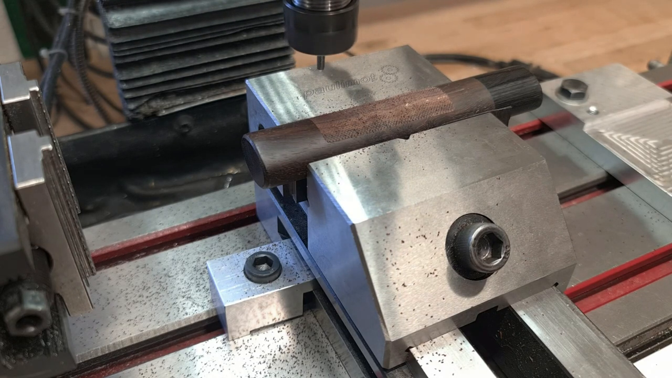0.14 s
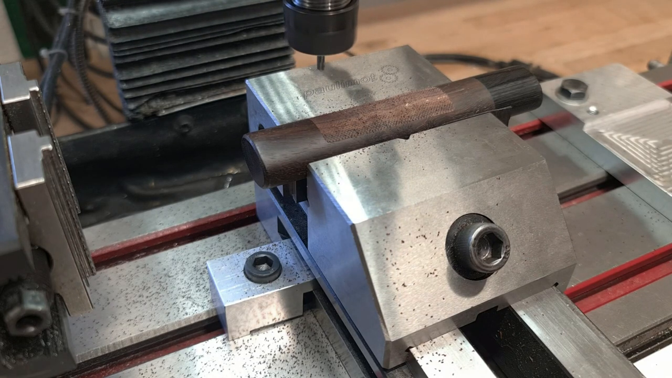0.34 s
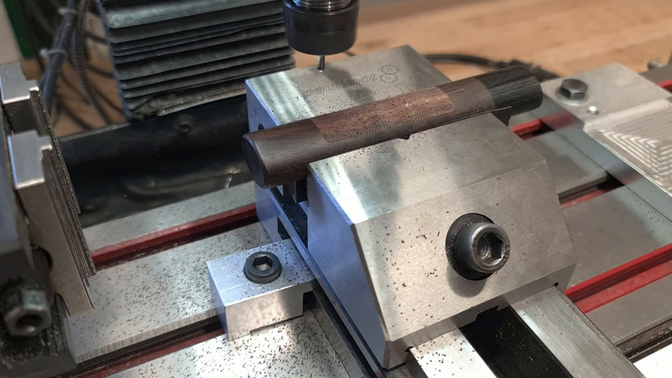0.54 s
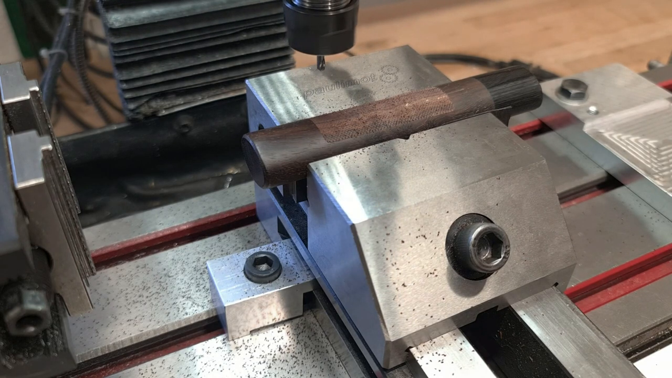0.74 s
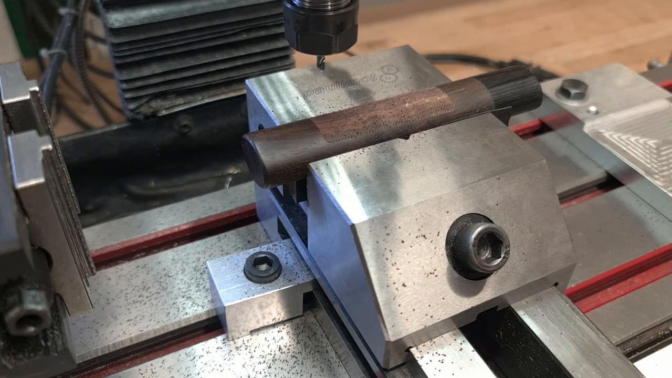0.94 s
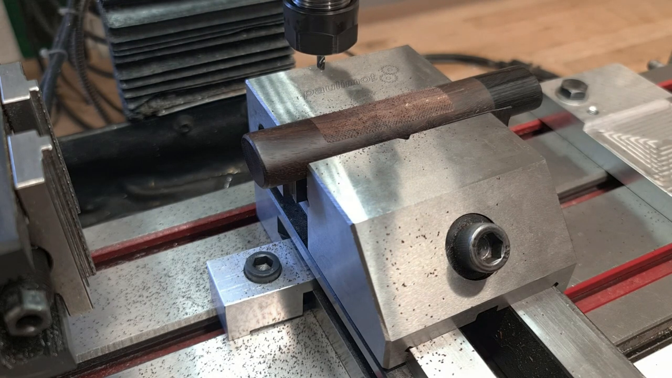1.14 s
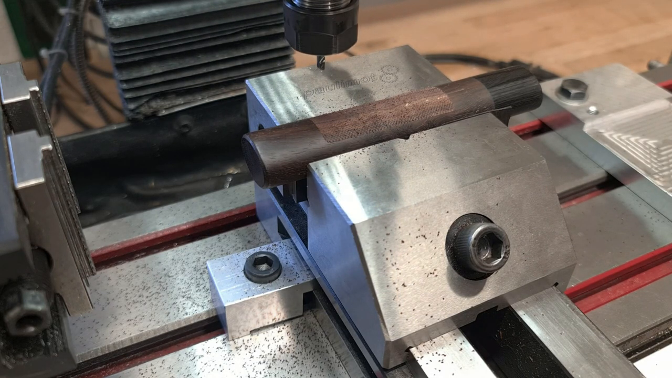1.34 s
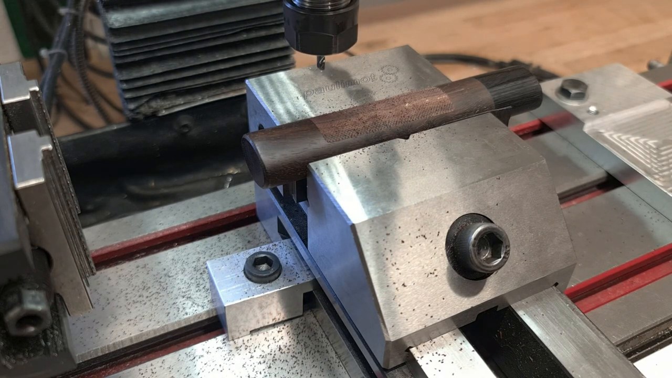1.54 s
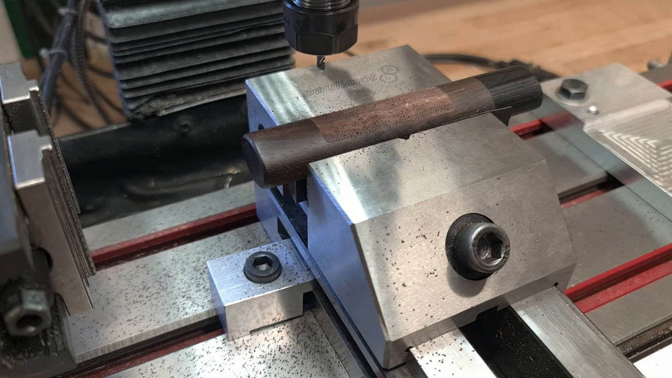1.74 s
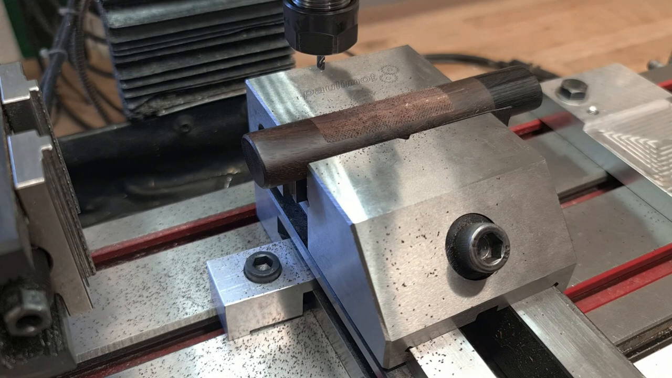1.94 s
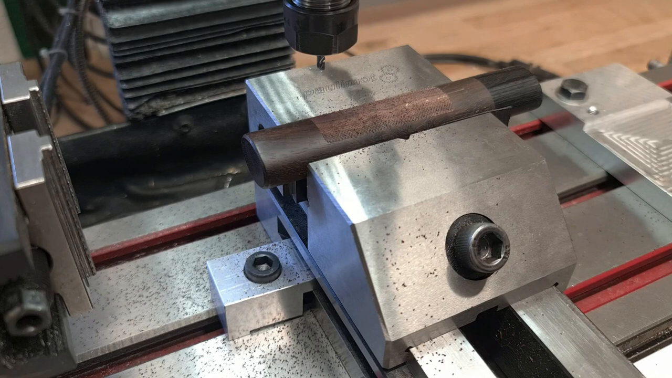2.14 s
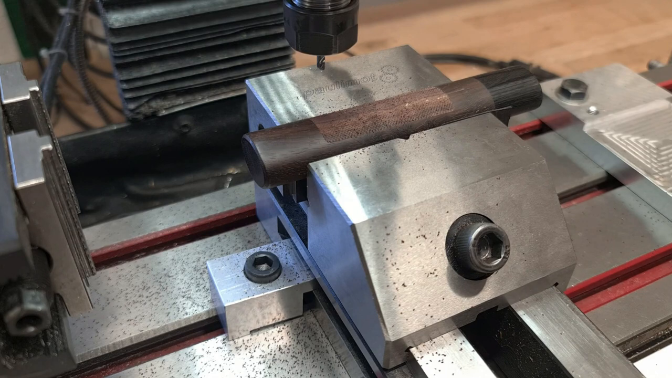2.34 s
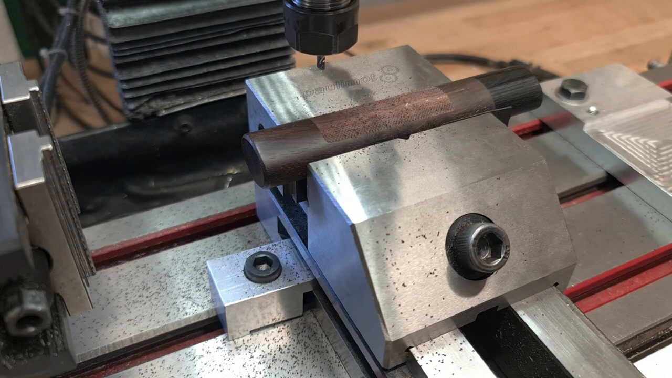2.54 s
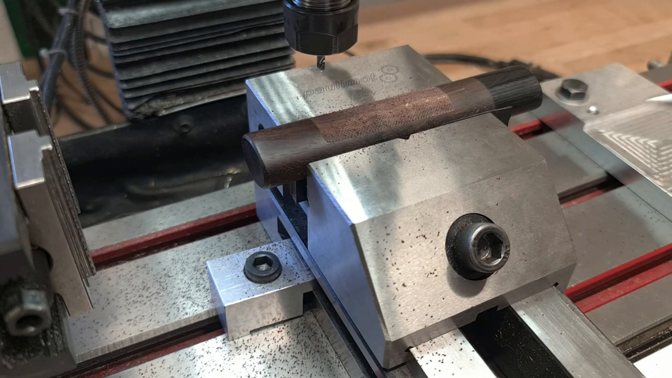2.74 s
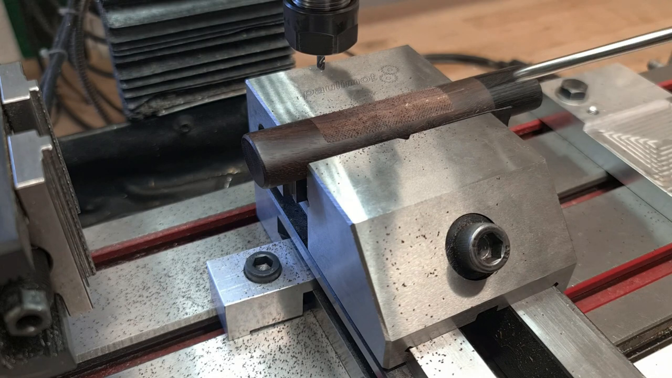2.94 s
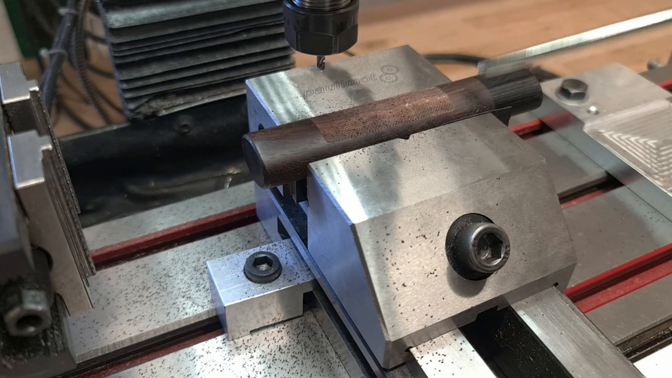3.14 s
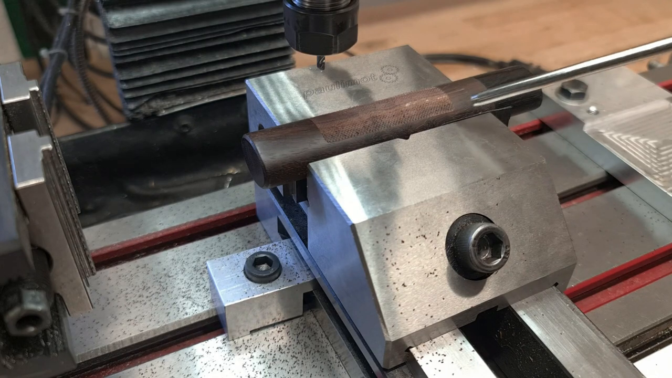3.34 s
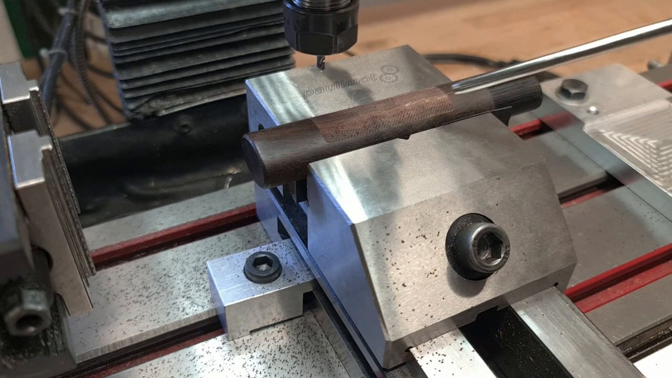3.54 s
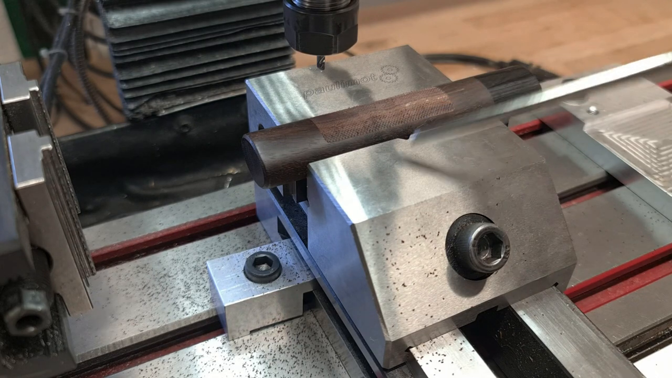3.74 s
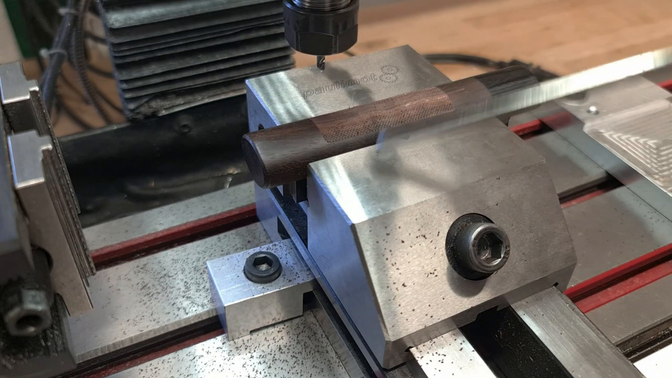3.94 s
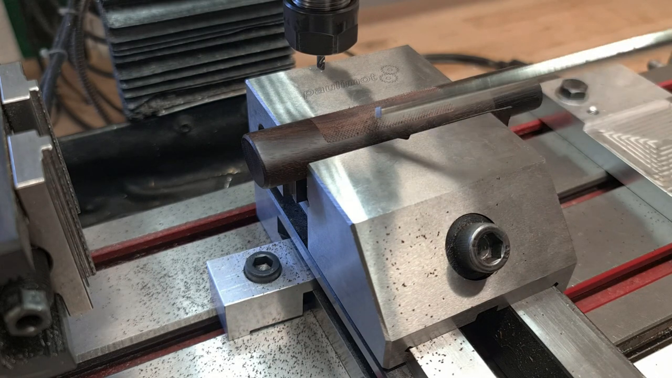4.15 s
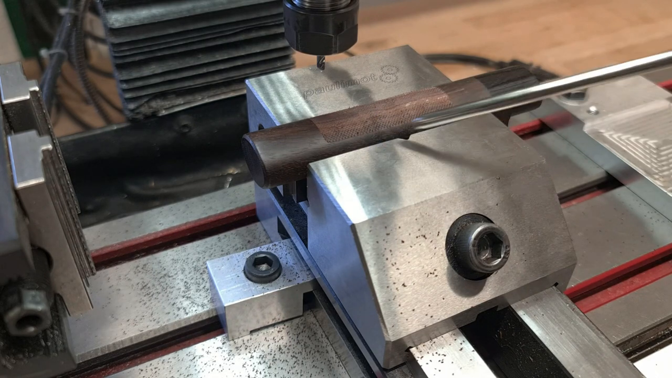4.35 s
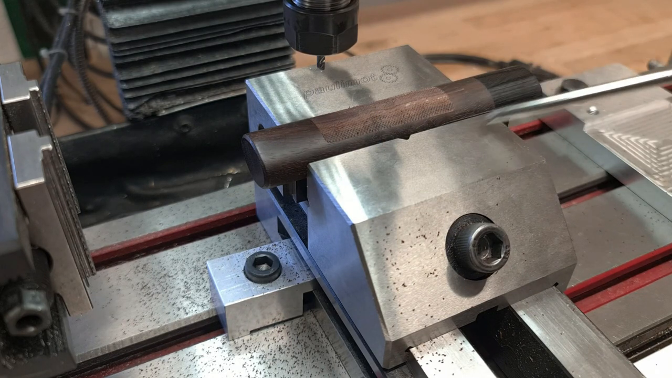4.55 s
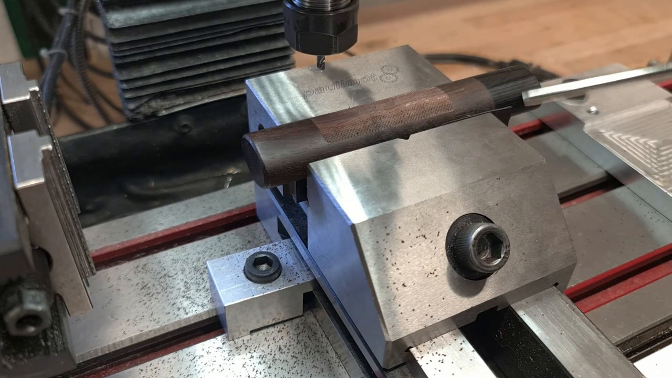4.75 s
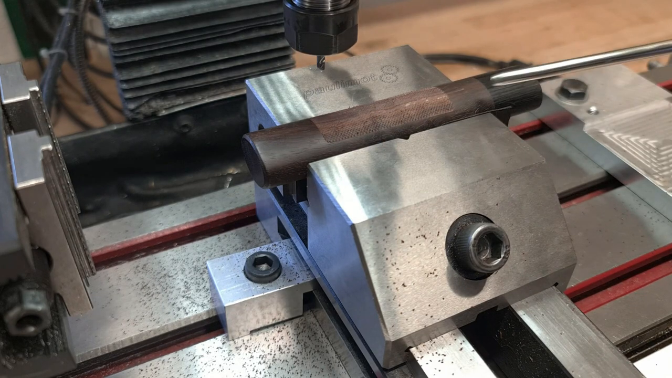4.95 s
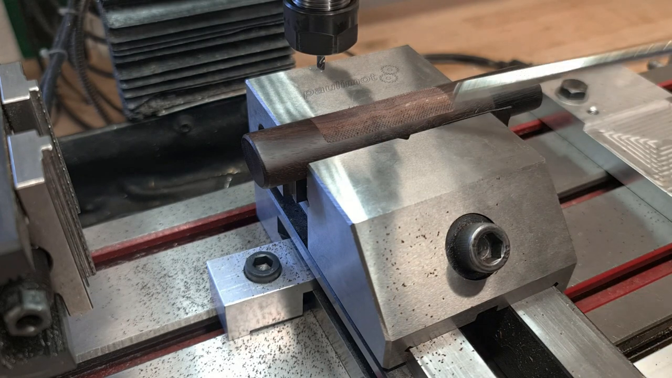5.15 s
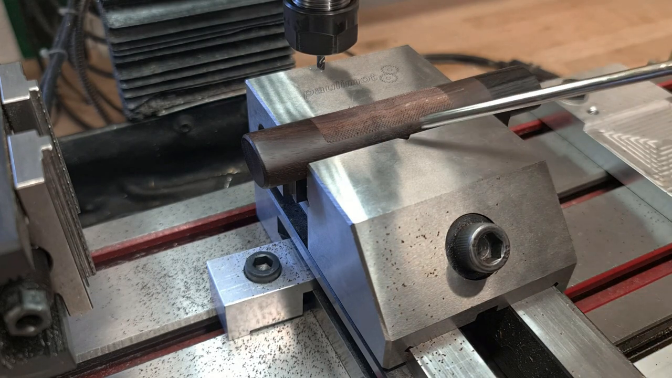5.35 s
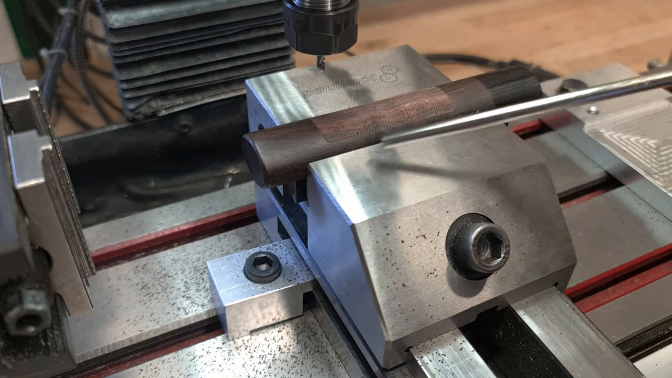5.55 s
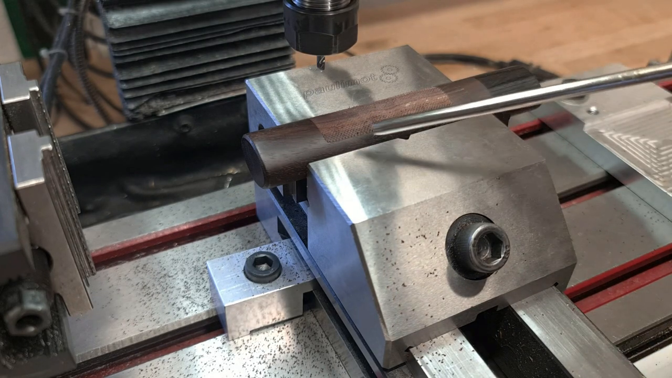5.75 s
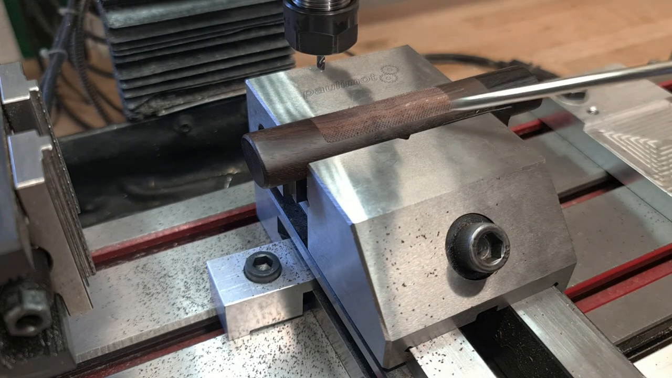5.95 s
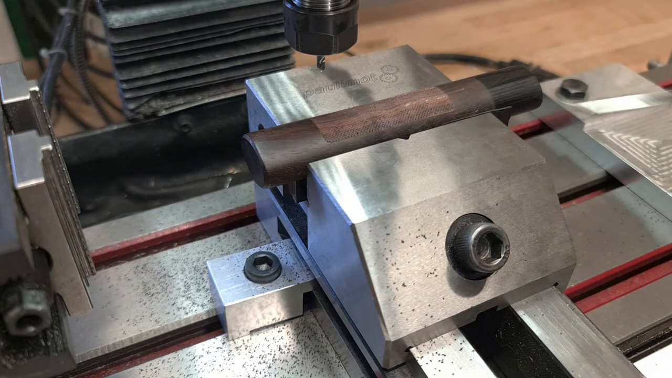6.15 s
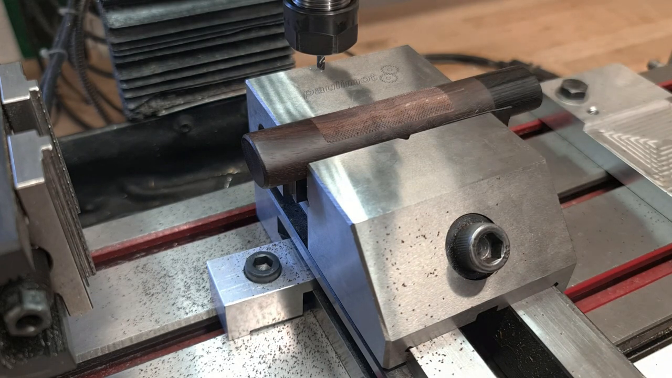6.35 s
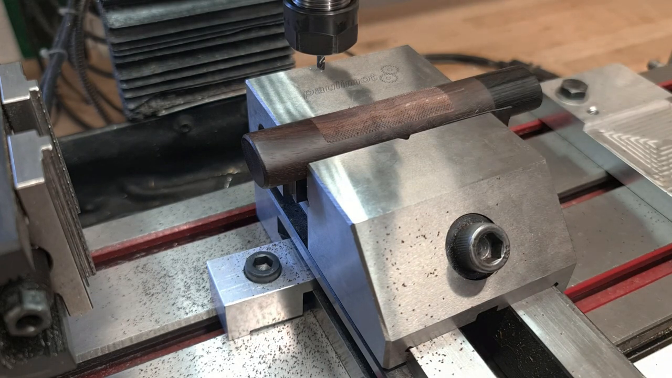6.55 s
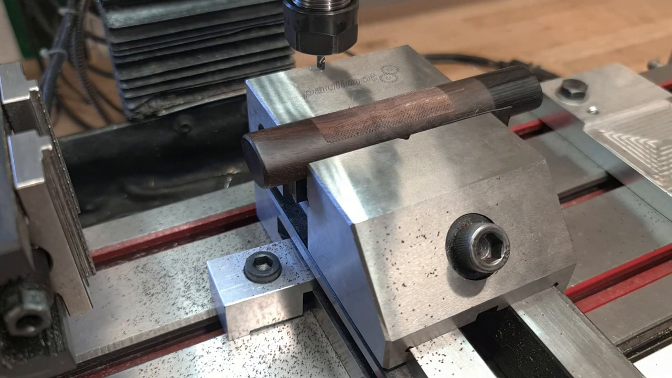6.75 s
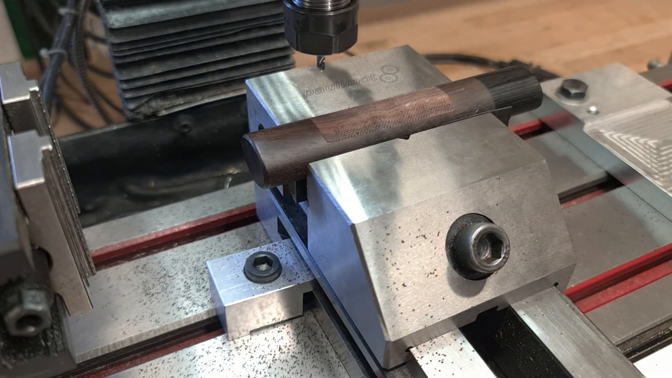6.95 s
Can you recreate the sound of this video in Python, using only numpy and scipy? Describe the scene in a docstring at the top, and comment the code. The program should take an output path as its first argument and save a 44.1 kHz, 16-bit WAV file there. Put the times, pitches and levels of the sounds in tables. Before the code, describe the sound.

A small milling machine whooshes to rest over workshop hum, then an air gun hisses for three seconds and is put down with a clatter.

```python
"""The whoosh of a small milling machine coasting to rest, over the hum of workshop fans and motors.
An air blow gun comes off its hook with a few knocks, ringing clicks and a squealing scrape.
It blows over the vise and the part for three seconds: the turbulent jet hisses, makes slots and
gaps sing, and roars where it strikes edges. Then the gun is put down with a clatter."""
import sys
import numpy as np
from scipy import signal
from scipy.io import wavfile
from scipy.ndimage import uniform_filter1d

SR = 44100
rng = np.random.default_rng(int(sys.argv[2]) if len(sys.argv) > 2 else 0)


def transcribe(signal):
    """Save signal, clipped to [-1, 1], as a 16-bit WAV file at the path in sys.argv[1]."""
    frames = np.atleast_2d(signal).T
    limited = np.clip(frames, -1, 1)
    pcm = np.round(limited * 32767).astype(np.int16)
    wavfile.write(sys.argv[1], SR, pcm)


N = 308259


def amp(db):
    """Decibels to gain."""
    return 10 ** (np.asarray(db) / 20)


def unit_rms(x):
    """Scales to rms 1."""
    return x / np.sqrt(np.mean(abs(x) ** 2) + 1e-20)


def curve(points, hz):
    """Reads a breakpoint curve on a log-frequency axis."""
    f, value = np.transpose(points)
    return np.interp(np.log(hz + 1), np.log(f + 1), value)


def bells(peaks, hz):
    """Sum of bell-shaped boosts and cuts, in dB."""
    return sum(db / (1 + ((hz - f) / (width / 2)) ** 2) for f, width, db in peaks)


def normalise(shape_db, hz, lo_hz, hi_hz):
    """Shifts a spectrum so that its band lo-hi has rms 1."""
    power = (amp(shape_db) ** 2 * ((hz > lo_hz) & (hz < hi_hz))).sum(0)
    return shape_db - 10 * np.log10(power / len(hz))


def grid(size, until=N / SR):
    """Times and frequencies of short-time frames."""
    hop = size // 4
    return np.arange(int(until * SR) // hop + 5) * hop / SR, np.fft.rfftfreq(size, 1 / SR)[:, None]


def flutter(shape, bins, frames):
    """Random modulation of rms 1, smooth over some bins and frames."""
    field = rng.standard_normal(shape[::-1]).T
    return unit_rms(uniform_filter1d(uniform_filter1d(field, bins, 0), frames, 1))


def stereo_noise(field_db, coherence, lead=0, pan_db=0):
    """Noise shaped over frequency and time by field_db; the left side leads by `lead` radians."""
    size = 2 * len(field_db) - 2
    a, b, c, d = rng.standard_normal(field_db.shape[::-1] + (4,)).T
    left, independent = a + 1j * b, c + 1j * d
    right = (coherence * left + np.sqrt(1 - coherence ** 2) * independent) * np.exp(-1j * lead)
    spectra = np.array([left * amp(pan_db / 2), right * amp(-pan_db / 2)]) * amp(field_db)
    sound = signal.istft(spectra, nperseg=size, noverlap=size - size // 4)[1][:, :N] / np.sqrt(.6 * size)
    return np.pad(sound, ((0, 0), (0, N - sound.shape[1])))


# Colour of the spinning machine's air rush: f/Hz, level/dB
WHOOSH_EQ = [(88, -42), (150, 1), (179, -36), (270, -7), (309, -7), (854, -4), (1040, -13), (1290, -6.5),
             (2450, -9), (5570, -8), (16000, -21.5)]


def spindle():
    """The rush of spindle and fan fades as they slow, then stops; the treble dies first."""
    stop_s, coast_db_per_s, stop_db_per_s = .47, -44.5, -200
    t, hz = grid(size=512, until=.7)
    stopped = np.maximum(t - stop_s, 0)
    level_db = -35 + coast_db_per_s * t + stop_db_per_s * stopped
    treble_db = -8 - 5 * t - 400 * stopped
    field = normalise(curve(WHOOSH_EQ, hz), hz, 1000, 8000) + level_db
    field += treble_db * np.clip((hz - 7000) / 1500, 0, 1)
    field += 2.6 * flutter(field.shape, bins=8, frames=8)
    return stereo_noise(field, coherence=.11, pan_db=1.3)


# Broad colour of the steady background noise: f/Hz, level/dB
BED_EQ = [(15, -61), (25, -33.5), (90, -18.5), (475, -14.5), (515, -6.5), (691, -15.5), (749, -11),
          (879, -21.5), (1350, -12.5), (1910, -19), (2300, -20.5), (12400, -45.5), (15000, -63.5)]
# Its humps and dips: f/Hz, width/Hz, gain/dB
BED_BELLS = [(55, 15, -3), (95.6, 20, 14.5), (195.4, 20, 5.5), (382, 14, 5), (536, 46, -3), (743, 84, -1),
             (1400, 125, 2.5), (2180, 100, -6.5), (3130, 80, 2), (3730, 140, 3.5), (6800, 900, 3),
             (8500, 1100, -11), (10800, 600, -9), (12400, 600, 4)]
# Its stereo image, wider toward the top: f/Hz, coherence/0-1
BED_COHERENCE = [(60, .88), (250, .9), (600, .75), (1000, .55), (2500, .5), (4000, .25), (15000, .2)]
# Its phase offset: f/Hz, left lead/rad
BED_LEAD = [(60, 0), (780, .7), (1400, 2.5), (2330, 5.4), (15000, 6)]
# Its balance: f/Hz, left over right/dB
BED_PAN = [(60, -3), (120, 0), (240, -0.5), (480, 0), (950, -1.5), (1890, 3), (3770, -2), (7520, 1.5),
           (15000, -6.5)]


def noise_bed():
    """Broad, slowly shifting background noise in the workshop."""
    t, hz = grid(size=2048)
    field = normalise(curve(BED_EQ, hz) + bells(BED_BELLS, hz), hz, 0, SR) - 49.5
    field = field + 1.3 * flutter((len(hz), len(t)), bins=2, frames=24)
    field += 2.2 * flutter(field.shape, bins=2, frames=250)  # standing waves of the room
    return stereo_noise(field, curve(BED_COHERENCE, hz), curve(BED_LEAD, hz), curve(BED_PAN, hz))


# Tones of motors and fans, ahead of the bed's fade: f/Hz, starting rms level/dB, slope/(dB/s)
MOTOR_TONES = [(96.9, -72, 0), (197, -72, 0), (366.1, -73, 0), (511.4, -56, 0), (565, -72, 0),
               (614, -73, .5), (635.2, -72, 0), (742.9, -68.5, -.6), (775.2, -70, -1), (1017, -77, 0),
               (1330, -66, -.4), (1394, -73, 0), (1534, -71, 0), (1755, -67.5, -1.4), (1825, -80, 0),
               (2043, -81, .7), (2132, -75.5, 0), (2336, -71.5, 0), (2600, -80, 0), (3203, -81, -.2),
               (3585, -77, -.2), (12242, -91, 0)]


def motor_hum():
    """Motors and fans hold tones that waver in level and pitch."""
    t, _ = grid(size=2048)
    out, time = np.zeros((2, N)), np.arange(N) / SR
    for f, db, slope in MOTOR_TONES:
        drift, swell = (np.interp(time, t, row) for row in flutter((2, len(t)), bins=1, frames=6))
        cycles = np.cumsum(f * (1 + .0002 * drift)) / SR + rng.random((2, 1)) * .15
        out += np.sqrt(2) * amp(db + slope * time + .9 * swell) * np.sin(2 * np.pi * cycles)
    return out


# Dull knocks of the machine, then of the hook: t/s, level/dB, f/Hz, t60/s
KNOCK_CUES = [(0.02, -44.5, 271, 0.2), (0.205, -44, 275, 0.17), (1.645, -47, 1030, .09),
              (1.704, -43.5, 397, 0.12), (1.742, -37.5, 414, 0.15), (1.797, -39.5, 367, 0.083),
              (2.152, -44, 700, 0.059), (6.141, -44.5, 400, 0.093)]


def knocks():
    """Each bump sets one damped low mode ringing, dead centre."""
    attack_s = .0016
    out, t = np.zeros((2, N)), np.arange(8192) / SR
    for start, db, hz, t60 in KNOCK_CUES:
        envelope = amp(db - 60 * t / t60) * np.minimum(t / attack_s, 1)
        out[:, round(start * SR):][:, :len(t)] += envelope * np.sin(2 * np.pi * hz * t)
    return out


# Modes of the gun's steel tube: f/Hz, level/dB, t60/s
TUBE_MODES = [(4350, -6, .022), (6200, -5, .025), (8950, -15, .018), (10850, -14, .022), (14200, -13, .018)]
# Clicks of machine and gun:
# t/s, level/dB, left over right/dB, treble gain/dB, ring f/Hz, ring gain/dB, ring t60/s
CLICK_CUES = [(0.352, -36.5, 1, -14, 5930, -7, 0.012), (0.41, -38, 2.5, -12, 5600, -14, .015),
              (1.6482, -46, -4, -14, 5360, -12, .02), (1.7414, -36, -6, 1, 4780, 1, 0.036),
              (1.8744, -35.5, -9, 6.5, 2780, -13, 0.06), (1.951, -34, -6, 6, 2260, -2.5, 0.035),
              (2.0914, -46.5, -6, -10, 3100, -10, .015), (2.1445, -48, -2, -16, 3700, -12, 0.06),
              (2.4655, -48, -6, -20, 2900, -6, .02), (2.4724, -32, -6, -9, 4980, -11, .014),
              (2.546, -44.5, -2.5, -14, 2930, 2, 0.012), (2.567, -52, -2.5, -14, 2950, 0, .015),
              (6.1053, -24, -5, -1.5, 2215, -19.5, .09), (6.1398, -25, -1, -2.5, 2210, -17, 0.068),
              (6.144, -28, -7, 5, 4470, -20, .11), (6.9086, -30.5, -3, -20, 2290, -5, 0.011)]


def clicks():
    """Metal hits: a two-band crack with its echo off the machine, a ring, and the tube's modes."""
    crack_t60_s, echo_t60_s, echo_db = .019, .16, -11
    out, t = np.zeros((2, N + 8192)), np.arange(8192) / SR
    bite = signal.butter(2, [2200, 7500], "band", fs=SR)
    treble = signal.butter(2, [8500, 15000], "band", fs=SR)
    tube = sum(amp(db - 60 * t / t60) * np.sin(2 * np.pi * hz * t) for hz, db, t60 in TUBE_MODES)
    for start, db, pan_db, treble_db, hz, ring_db, t60 in CLICK_CUES:
        white = rng.standard_normal((2, len(t))) + .34 * rng.standard_normal(len(t))
        burst = unit_rms(signal.lfilter(*bite, white))
        burst += amp(treble_db) * unit_rms(signal.lfilter(*treble, white))
        crack = amp(-7.5) * burst * (amp(-60 * t / crack_t60_s) + amp(echo_db - 60 * t / echo_t60_s))
        ring_envelope = amp(ring_db - 60 * (t / t60) ** 1.6) * np.minimum(t / .001, 1)
        ring = ring_envelope * np.sin(2 * np.pi * hz * t)
        # loose parts make the ringing uneven
        rattle = 1 + .5 * np.minimum(t / .015, 1) * unit_rms(uniform_filter1d(white, size=200))
        click = crack + rattle * (ring + amp(treble_db - 7) * tube)
        out[:, round(start * SR):][:, :len(t)] += amp(db + np.array([[.5], [-.5]]) * pan_db) * click
    return out[:, :N]


# Hose and gun sliding on metal:
# t/s, hold/s, level/dB, release/(dB/s), squeal f/Hz, squeal glide/(Hz/s), squeal gain/dB
SCRAPE_CUES = [(1.633, .04, -64, -78, 5400, 0, 12), (1.737, .02, -47, -150, 4750, 0, 14),
               (1.795, 0.073, -48.5, -150, 2700, 7000, 7), (1.869, 0.093, -44, -170, 2700, 5000, 10.5),
               (2.46, .0097, -53, -120, 5000, 0, 10), (6.114, .011, -46, -600, 4500, 0, 8),
               (6.147, 0.045, -43.5, -350, 4530, 0, 8), (6.9, .02, -51, -280, 6400, 0, 2)]
# Colour of the friction: f/Hz, level/dB
SCRAPE_EQ = [(590, -37), (1000, -6), (1380, -6.5), (3890, -8), (4470, -6), (6470, -7), (8550, -15.5),
             (9280, -11), (14400, -21), (16000, -21)]
# Resonances of the rubbed metal: f/Hz, width/Hz, gain/dB
SCRAPE_BELLS = [(2800, 300, 3), (4500, 350, 2), (6500, 500, 5), (9000, 500, 3)]


def scrapes():
    """Grainy friction noise; each slide rises, holds and dies away, squealing at its own pitch."""
    attack_s, squeal_width_hz = .0071, 300
    t, hz = grid(size=256)
    starts, *_, squeal_hz, glide, squeal_db = np.transpose(SCRAPE_CUES)
    cue = np.maximum(np.searchsorted(starts, t) - 1, 0)  # the latest slide in each frame
    pitch = squeal_hz[cue] + glide[cue] * (t - starts[cue])
    squeal = bells([(pitch, squeal_width_hz, squeal_db[cue])], hz)
    field = normalise(curve(SCRAPE_EQ, hz) + bells(SCRAPE_BELLS, hz) + squeal, hz, 2500, 15000)
    field += 2.2 * flutter(field.shape, bins=4, frames=20)
    time, envelope = np.arange(N) / SR, 0
    for start, hold, db, release, *_ in SCRAPE_CUES:
        attack = np.clip((time - start) / attack_s, 0, 1) ** 2
        envelope += attack * amp(db + release * np.maximum(time - start - attack_s - hold, 0))
    return envelope * stereo_noise(field, coherence=.13)


# Singing slots and gaps, and dips between them: f/Hz, width/Hz, gain at part/dB, gain over table/dB
CAVITY_BELLS = [(1068, 230, -4, 11.5), (1480, 1030, -8.5, 2), (1780, 100, -0.5, -6.5),
                (2490, 118.7, 9, -1.5), (2680, 110, 2, 6), (3060, 86, -2, 11.5), (3370, 260, 4.5, 3),
                (3716, 170, 0, 10), (3950, 150, -1.5, -5.5), (4420, 100, -4.5, 9), (4700, 200, 4, 0.5),
                (5880, 450, 1.5, 8.5), (6410, 510, 6.5, 11), (6810, 247, 2, 12.5), (7440, 200, 6, -7),
                (8890, 330, -0.5, 10.5), (11190, 540, 8.5, -5.5)]
# One gap sings out or falls quiet as the jet crosses it: middle t/s, length/s, f/Hz, width/Hz, gain/dB
GAP_CUES = [(2.9, 0.21, 4430, 220, 5), (2.874, 0.19, 3000, 2100, 2), (2.95, 0.33, 3720, 260, 4),
            (4.65, 0.52, 11500, 500, 2), (2.8, 0.27, 1020, 320, -8), (3.07, 0.12, 1600, 450, 5.5),
            (3.08, 0.19, 5300, 300, 5.5), (5.2, 0.52, 6340, 500, 3.5), (3.18, .35, 10200, 1400, 4),
            (3.25, .2, 4100, 200, 5), (4.62, .55, 5850, 200, 4.5), (4.5, .3, 5480, 200, -7),
            (5.1, .45, 2700, 100, 4), (4.14, 0.18, 4400, 120, 5), (4.05, 0.15, 7200, 360, 9),
            (4.172, 0.12, 3260, 200, 7.5), (4.17, 0.23, 15000, 500, 5), (4.52, 1, 13500, 880, 7.5),
            (4.65, 0.55, 4510, 130, 5), (5.25, 0.8, 1030, 93, 5.5), (5.3, 0.67, 1920, 50, 6),
            (5.57, .25, 4410, 110, 7), (5.204, 0.26, 7700, 430, -6), (5.3, 0.49, 14800, 650, 5),
            (5.2, .5, 13000, 600, 4), (5.586, 0.4, 3550, 190, 4.5), (5.55, 0.3, 3690, 140, 6)]


def singing_gaps(t, hz, over_table):
    """Moving EQ, in dB, of the cavities the jet excites; they drift as the hand trembles."""
    pitch_depth, gain_depth = .009, .15
    sway, waver = flutter((2 * len(CAVITY_BELLS), len(t)), bins=1, frames=30).reshape(2, -1, len(t))
    peaks = []
    for (f, width, part_db, table_db), bend, swell in zip(CAVITY_BELLS, sway, waver):
        db = part_db + over_table * (table_db - part_db)
        peaks.append((f * (1 + pitch_depth * bend), width, db * (1 + gain_depth * swell)))
    for mid, length, f, width, db in GAP_CUES:
        peaks.append((f, width, db * np.clip(2 - abs(t - mid) / (length / 4), 0, 1)))
    return bells(peaks, hz)


# Hiss with the nozzle at the part: f/Hz, level/dB
PART_HISS_EQ = [(590, -44), (1000, -40), (1550, 6.5), (1770, -3), (2490, -5), (4580, 1), (8500, -6.5),
                (11000, -32.5), (18700, -120)]
# Hiss over the open machine table: f/Hz, level/dB
TABLE_HISS_EQ = [(590, -29), (1000, -30), (1650, -3), (2320, -9), (2750, -3), (4040, -10), (4540, -4),
                 (8500, -27.5), (11000, -50), (18700, -120)]
# Midrange roar of air on edges: f/Hz, level/dB
ROAR_EQ = [(150, -45.5), (250, -24), (570, -1.5), (881, 0), (971, 4.5), (1500, 5.5), (1950, -36.5),
           (3300, -120)]
# Top-end fizz of the nozzle: f/Hz, level/dB
FIZZ_EQ = [(4120, -32.5), (7000, -6.5), (7690, -2.5), (9050, 1), (10300, -3.5), (11100, 0), (14700, 8.5),
           (15200, 9), (15650, -1), (15850, -28.5)]
# Low-end buffeting on edges: f/Hz, level/dB
BUFFET_EQ = [(24, -50.5), (40, -24), (86, -7), (286, -7.5), (400, -1), (520, -22.5), (880, -120)]
# Swells as the jet crosses an edge: middle t/s, length/s, roar/dB, fizz/dB, buffeting/dB
EDGE_CUES = [(2.91, 0.057, 1, 2, 12), (3.088, 0.24, 7, 11, 14.5), (3.378, 0.21, 1, 5, 7.5),
             (3.492, 0.18, 4.5, 0, 5), (4.086, 0.3, 6.5, 6, 1.5), (4.304, 0.39, -3.5, 4.5, 2),
             (5.065, 0.3, 5.5, 1.5, 2), (5.61, 0.2, 4.5, 6, 1), (5.74, 0.18, 5.5, 7.5, 11)]


def turbulence(t, hz, over_table):
    """The jet's spectrum in dB: hiss, roar, fizz and buffeting, crossfaded by where it is aimed."""
    at_part_db, over_table_db = (-15.5, -4.5, -32), (-19.5, -4.5, -46.5)  # roar, fizz, buffet re hiss
    at_part = 1 - over_table
    mix_db = np.outer(at_part_db, at_part) + np.outer(over_table_db, over_table)
    for mid, length, *swell_db in EDGE_CUES:
        mix_db += np.outer(swell_db, np.clip(1 - abs(t - mid) / (length / 2), 0, 1))
    roar_db, fizz_db, buffet_db = mix_db
    singing = singing_gaps(t, hz, over_table)
    hiss_eq = at_part * curve(PART_HISS_EQ, hz) + over_table * curve(TABLE_HISS_EQ, hz)
    hiss = normalise(hiss_eq + singing, hz, 1500, 7500)
    roar = normalise(curve(ROAR_EQ, hz) + singing, hz, 400, 1200) + roar_db
    fizz = normalise(curve(FIZZ_EQ, hz) + singing, hz, 8000, 15500) + fizz_db
    buffet = normalise(curve(BUFFET_EQ, hz), hz, 60, 300) + buffet_db
    return 10 * np.log10(sum(amp(layer) ** 2 for layer in (hiss, roar, fizz, buffet)))


# Envelope of the blast as nozzle pressure varies, from valve opening to closing: t/s, level/dB
JET_ENVELOPE = [(2.69, -74), (2.715, -58), (2.75, -30.5), (2.815, -19), (2.835, -13.5), (2.885, -11),
                (2.911, -16), (2.99, -9), (3.1, -12), (3.24, -15.5), (3.3, -11.5), (3.52, -16.5),
                (3.8, -16.5), (4.0, -14), (4.16, -17.5), (4.42, -21.5), (4.64, -19), (4.92, -17.5),
                (4.97, -19), (5.13, -15), (5.24, -13), (5.371, -14.5), (5.49, -13), (5.69, -16),
                (5.75, -22.5), (5.78, -33.5), (5.92, -69)]
# The nozzle's sweep along the part: t/s, left lead/microseconds, aim/0-1 (0 part, 1 open table)
NOZZLE_PATH = [(2.7, 46, 1.), (2.9, 28, 0.88), (3.0, 10, 0.35), (3.3, 98, 0.18), (3.6, 93, 0.18),
               (3.9, 96, 0.22), (4.1, 50, 0.81), (4.4, -20, 0.67), (4.55, 21, 1), (4.8, 63, 0.85),
               (5.0, 54, 0.58), (5.2, 101.5, 0.4), (5.5, 81, 0.21), (5.75, -35, 0.74)]
# Stereo image of the jet: f/Hz, coherence/0-1
JET_COHERENCE = [(100, .8), (600, .72), (1500, .72), (3000, .62), (6000, .55), (8000, .45), (15000, .52)]
# Phase offset on top of the sweep's delay: f/Hz, left lead/rad
JET_LEAD = [(300, .3), (1000, 0.2), (2200, 0.26), (4500, -0.5), (9000, -0.1)]
# Balance on top of the jet's pan: f/Hz, left over right/dB
JET_PAN = [(60, -2), (500, -1.5), (1000, -2), (3000, 0), (6000, -2.5), (7500, 2.5), (8500, -2.5),
           (15000, -3.5)]


def air_jet():
    """Compressed air rushes from the nozzle; colour and stereo position follow the sweep."""
    pan_left_db = 3
    t, hz = grid(size=1024, until=6)
    path_s, lead_us, aim = np.transpose(NOZZLE_PATH)
    field = turbulence(t, hz, over_table=np.interp(t, path_s, aim))
    field += np.interp(t, *np.transpose(JET_ENVELOPE), left=-200, right=-200)
    # narrow reflections drift, most in the treble
    field += (2 + 1.2 * (hz > 7000)) * flutter(field.shape, bins=3, frames=28)
    field += .84 * flutter(field.shape, bins=120, frames=2)  # eddies flicker over wide bands
    lead = 2 * np.pi * hz * np.interp(t, path_s, lead_us) * 1e-6 + curve(JET_LEAD, hz)
    return stereo_noise(field, curve(JET_COHERENCE, hz), lead, pan_left_db + curve(JET_PAN, hz))


def scene():
    """The stereo mix: machine and blow gun over a workshop bed that slowly grows quieter."""
    bed_db_per_s = -.2
    bed_fade = amp(bed_db_per_s * np.arange(N) / SR)
    return spindle() + bed_fade * (noise_bed() + motor_hum()) + knocks() + clicks() + scrapes() + air_jet()


def record(dry):
    """Gentle gain control ducks the mix under the blast; then a soft clip and a low-pass."""
    threshold_db, duck_db_per_db, release_db_per_s = -40, .18, 60
    ceiling, cutoff_hz = 1.2, 16100
    power_db = 10 * np.log10(abs(uniform_filter1d((dry ** 2).mean(0), 2000)) + 1e-12)
    fall_db = np.arange(N) * release_db_per_s / SR
    held_db = np.maximum.accumulate(power_db + fall_db) - fall_db
    over_db = np.maximum(held_db - threshold_db, 0)
    ducked = dry / amp(duck_db_per_db * uniform_filter1d(over_db, 1000))
    rounded = ceiling * np.tanh(ducked / ceiling)
    lowpass = signal.firwin(511, cutoff_hz, window=("kaiser", 9), fs=SR)
    return signal.oaconvolve(rounded, lowpass[None], "same")


dry = scene()
out = record(dry)
transcribe(out)
```